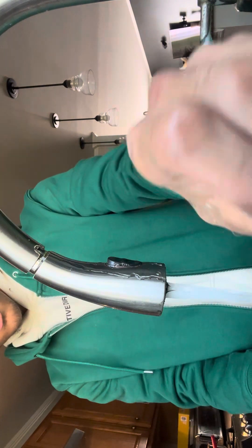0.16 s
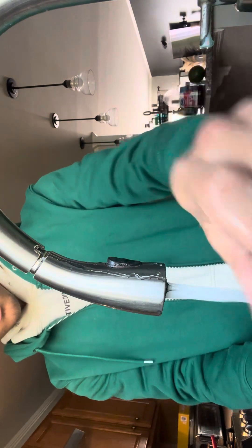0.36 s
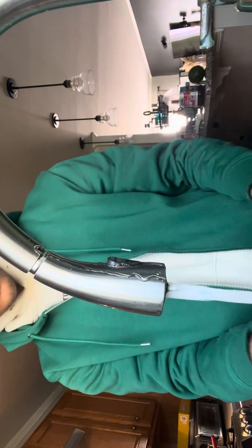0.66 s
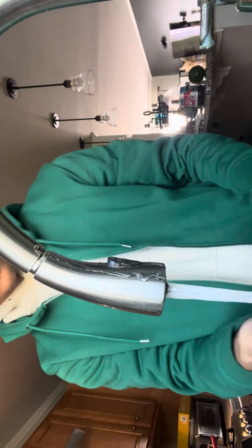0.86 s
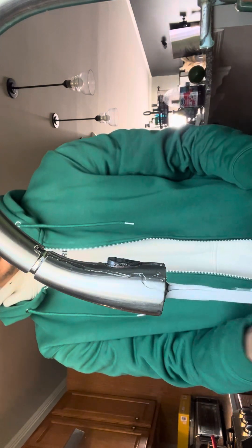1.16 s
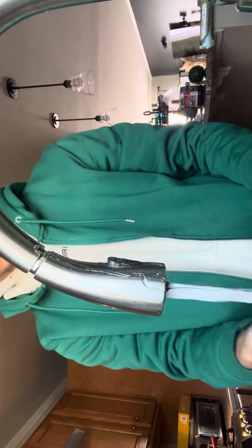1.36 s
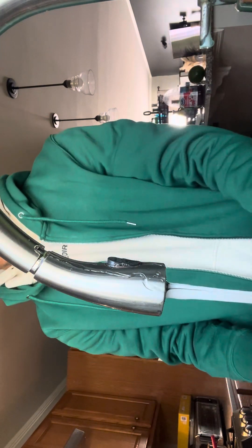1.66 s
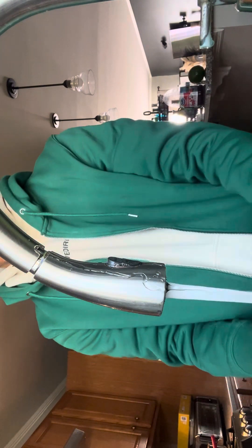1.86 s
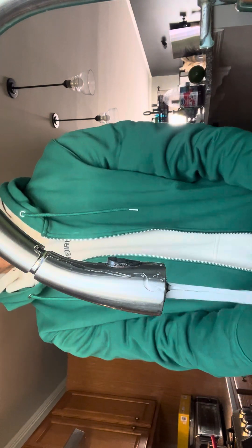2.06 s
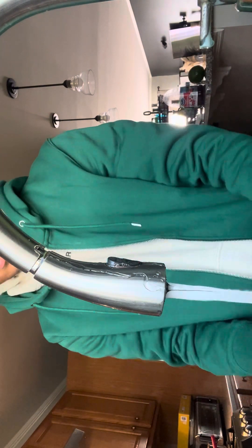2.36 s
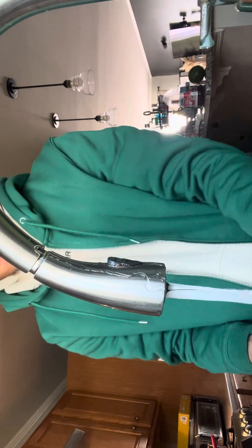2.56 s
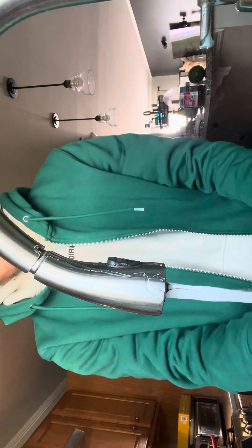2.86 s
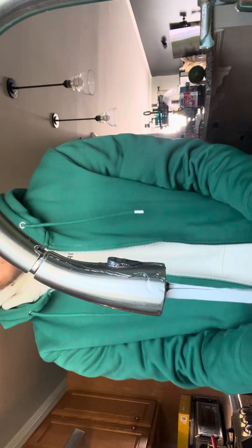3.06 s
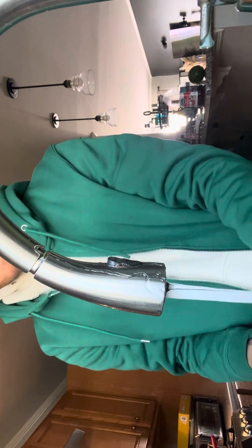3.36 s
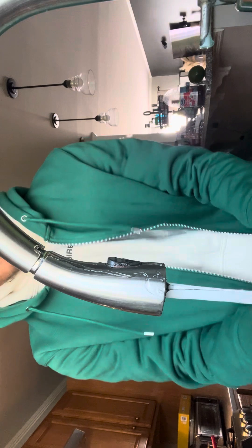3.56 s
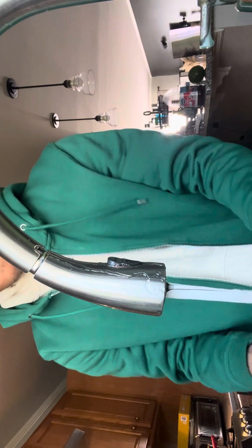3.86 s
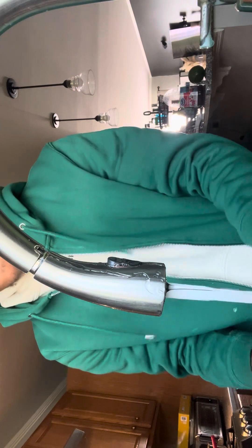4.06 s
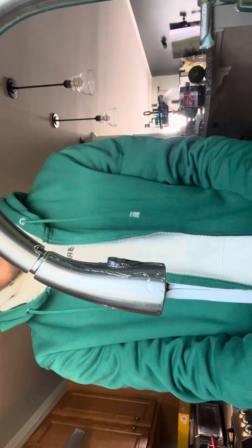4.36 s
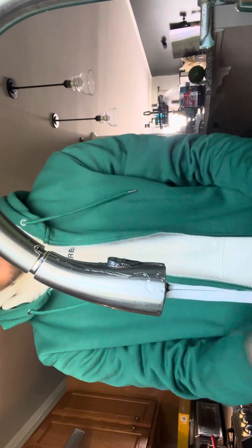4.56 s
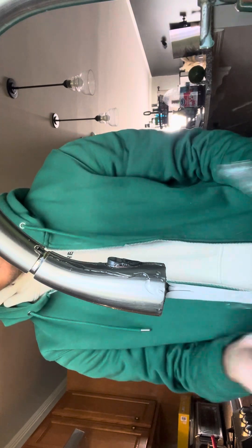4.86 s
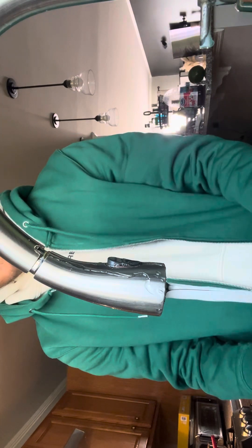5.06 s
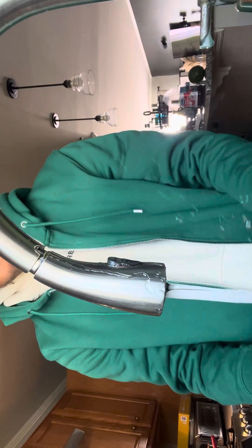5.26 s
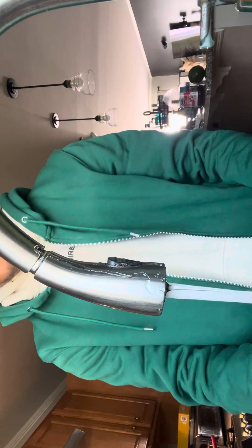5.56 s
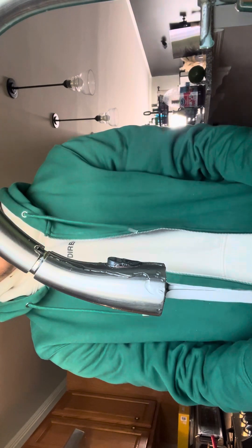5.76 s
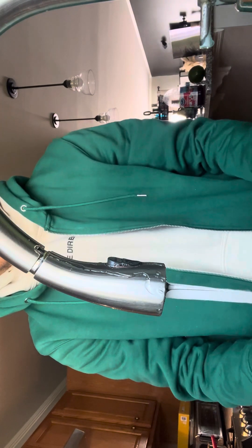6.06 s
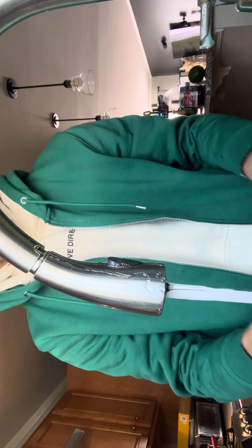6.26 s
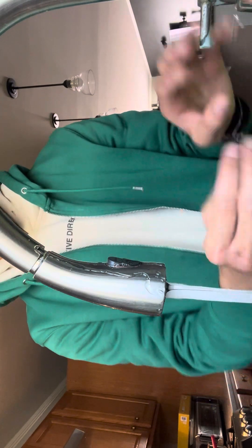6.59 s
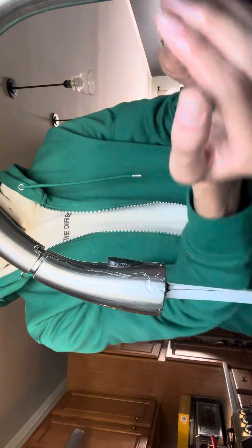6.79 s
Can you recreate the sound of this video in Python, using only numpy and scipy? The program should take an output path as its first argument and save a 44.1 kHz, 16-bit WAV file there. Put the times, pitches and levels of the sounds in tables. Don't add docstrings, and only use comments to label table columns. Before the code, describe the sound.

Close, bright running water broken by hands washing: surging spray, sloshing palms, pinging drops and a few dull bumps on a metal basin.

```python
import sys
import numpy as np
from scipy import signal
from scipy.fft import rfft, irfft, next_fast_len
from scipy.io import wavfile

SR = 44100
rng = np.random.default_rng(int(sys.argv[2]) if len(sys.argv) > 2 else 0)


def gain_from_db(level_db):
    decades = np.asarray(level_db, float) / 20
    return 10 ** decades


def log_audio(samples):
    frames = np.atleast_2d(samples).T
    limited = np.clip(frames, -1, 1)
    pcm = np.round(limited * 32767).astype(np.int16)
    wavfile.write(sys.argv[1], SR, pcm)


N = 305613


def rms_one(x):
    return x / np.sqrt(np.mean(x ** 2) + 1e-20)


def at_hz(points, hz, column=1):
    points = np.array(points)
    return np.interp(np.log(hz), np.log(points[:, 0]), points[:, column])


def drift(rate):
    r = np.exp(-80 * np.pi * rate / SR)
    noise = rng.standard_normal(N // 40 + 2002)
    slow = signal.lfilter([1], [1, -2 * r, r * r], noise)[2000:]
    return np.interp(np.arange(N) / 40, np.arange(len(slow)), rms_one(slow))


def ring(clicks, hz, t60):
    r = gain_from_db(-60 / (t60 * SR))
    w = 2 * np.pi * hz / SR
    return signal.lfilter([0, np.sin(w)], [1, -2 * r * np.cos(w), r * r], clicks + 1e-18)


def drive(per_s, spread_db, share):
    sizes = gain_from_db(spread_db * np.minimum(rng.exponential(1, (4, N)), 5))
    sizes = sizes * rng.choice([-1, 1], (4, N))
    impacts = rms_one(sizes * (rng.random((4, N)) < per_s / SR))
    return (rng.standard_normal((4, N)) + share * impacts).reshape(2, 2, N)


def coloured(spectrum, excite, patchy_db, flutter):
    octaves = np.log2(spectrum[-1][0] / spectrum[0][0])
    edges = spectrum[0][0] * 2 ** np.arange(0, octaves + .1, 1 / 3)
    out = 0
    for k, (low, high) in enumerate(zip(edges, edges[1:])):
        sos = signal.butter(2, [low, high], "band", fs=SR, output="sos")
        band = signal.sosfilt(sos, excite[k % 2])
        level_db = at_hz(spectrum, np.sqrt(low * high)) + patchy_db * drift(14.0)
        out = out + band * gain_from_db(level_db)
    return rms_one(out * gain_from_db(flutter))


def kitchen(x):
    t60_s = 0.073
    t = np.arange(round(.4 * SR)) / SR
    tail = rng.standard_normal((2, len(t))) * gain_from_db(-60 * t / t60_s) * (t > .002)
    tail = signal.sosfilt(signal.butter(2, 300, "high", fs=SR, output="sos"), tail)
    tail = tail / np.sqrt((tail ** 2).sum(1, keepdims=True))
    return signal.fftconvolve(x[None], tail, axes=1)[:, :N]


# (frequency [Hz], width [Hz], gain [dB])
BOWL_WAVES = [(650, 13, -12.5), (730, 26, -8.5), (1010, 90, -14), (1700, 82, 2), (1750, 23, 1.5),
              (2160, 115, -5.5), (2500, 270, -4), (3600, 120, 1.5), (6360, 340, 0)]


def bowl(x):
    for hz, width, db in BOWL_WAVES:
        w, a = 2 * np.pi * hz / SR, gain_from_db(db / 2)
        k = np.pi * width / SR
        top = [1 + k * a, -2 * np.cos(w), 1 - k * a]
        bottom = [1 + k / a, -2 * np.cos(w), 1 - k / a]
        x = signal.lfilter(top, bottom, x)
    return x


# (frequency [Hz], level per Hz [dB])
STREAM_COLOUR = [(2300, -12), (2900, -7), (4200, 6.5), (5200, 6.5), (6400, 6), (8000, -4), (9500, -29),
                 (11500, -2), (14000, 4.5), (17000, -7)]


def stream():
    excite = drive(4000, spread_db=1.0, share=1.0)
    return gain_from_db(-45) * coloured(STREAM_COLOUR, excite, 1.0, 0.15 * drift(12))


# (frequency [Hz], level per Hz [dB])
DRUM_COLOUR = [(30, -36), (42, -15), (65, -1), (90, -11), (122, -2), (150, -6.5), (200, -5.5), (300, -25),
               (500, -9.5)]


def drumming(drum_db):
    turbulence = rng.standard_normal((2, 2, N))
    return gain_from_db(drum_db - 3.6) * coloured(DRUM_COLOUR, turbulence, 2.0, 1.5 * drift(22))


# (start [s], end [s], level [dB])
FREE_JET_SPANS = [
    (0, 0.425, -41),
    (5.473, 6.93, -40),
]


def patter():
    pitch_hz, spread_hz, t60_s = 6400, 360, 0.0045
    t = np.arange(N) / SR
    gate = 0
    for start, end, db in FREE_JET_SPANS:
        gate = gate + gain_from_db(db) * np.clip(np.minimum(t - start + 0.026, end - t + .02) / .04, 0, 1)
    excite = drive(830, spread_db=3.5, share=2.5)
    pings = 0
    for k, step in enumerate((-1, 0, 1)):
        pings = pings + ring(excite[k % 2], pitch_hz + spread_hz * step, t60_s)
    return gate * rms_one(pings * gain_from_db(5.4 * drift(40)))


# (frequency [Hz], level per Hz [dB])
SLOSH_COLOUR = [(350, -4), (600, -8.5), (950, 1.5), (1250, -5.5), (1480, -3.5), (1950, 1.5), (2800, 7.5)]
# (frequency [Hz], width [Hz], level [dB])
HOLLOW_NOTES = [(123, 24, -3), (327, 27, -9), (583, 40, -5), (703, 45, -10), (1150, 110, -5),
                (1255, 30, -9), (1830, 90, -3), (1981, 70, -9), (2123, 20, -14), (2285, 70, -8)]


def slosh(slosh_db):
    excite = drive(500, spread_db=2.5, share=0.34)
    bed = coloured(SLOSH_COLOUR, excite, 1.8, 1.0 * drift(11.0))
    notes = 0
    for hz, width, db in HOLLOW_NOTES:
        note = rms_one(ring(excite[0], hz, 1.6 / width))
        notes = notes + gain_from_db(db + 2.2 * drift(8)) * note
    return gain_from_db(slosh_db + 3.0) * (bed + gain_from_db(-8.0) * notes)


# (frequency [Hz], struck level [dB], t60 [s])
BASIN_MODES = [(122.6, -7, 0.29), (170, 0.5, 0.061), (232.6, -7, 0.21), (325, -5, 0.15), (520, 4.5, 0.07),
               (674, -6.5, 0.12), (1050, -25, 0.05), (1245, -3, 0.088), (1800, 10, 0.14)]
# (time [s], peak [dB], hardness [dB], pitch of the hollow part [Hz])
KNUCKLES = [(0.687, -52, -24, 120), (1.207, -38.5, -11, 1310), (1.521, -33, 1, 940),
            (1.534, -36.5, -4, 580), (1.543, -22.5, -7, 121), (2.751, -33, -11, 221),
            (3.284, -30.5, -9.5, 520), (3.374, -29.5, -27, 147), (3.436, -36, -21, 118),
            (3.489, -30, -7.5, 520), (3.622, -32, -6.5, 538), (3.963, -26.5, -6.5, 325),
            (3.974, -22, -13.5, 127), (3.982, -17, -16.5, 89), (4.08, -27, -25, 67), (4.096, -31, -32, 69),
            (4.237, -31.5, -15, 130), (4.387, -31, 0, 218), (4.401, -32, -14, 323),
            (5.632, -34.5, -4.5, 517), (5.788, -34.5, -3, 106), (6.093, -41, 3, 1260),
            (6.817, -36.5, 2.5, 113), (6.869, -35, -20, 55), (6.899, -32, -0.5, 434)]


def knocks():
    rows = np.array(KNUCKLES)
    at = [round(s * SR) for s in rows[:, 0]]
    out = np.zeros(N)
    chance = rng.standard_normal((len(at), len(BASIN_MODES)))
    for (hz, db, t60), luck in zip(BASIN_MODES, chance.T):
        upper = np.clip(np.log2(hz / 250) / 0.27, 0, 1)
        push_db = rows[:, 1] + db - 7.5 + upper * rows[:, 2] + 3.75 * luck
        clicks = np.zeros(N)
        clicks[at] = gain_from_db(push_db) * np.sign(luck)
        out += ring(clicks, hz, t60)
    t = np.arange(8000) / SR
    band = signal.butter(2, [250, 1200], "band", fs=SR, output="sos")
    rattles = signal.sosfilt(band, rng.standard_normal((len(at), len(t))))
    for i, (s, db, hard_db, hz), rattle in zip(at, KNUCKLES, rattles):
        decay = gain_from_db(-60 * t / (.035 + 17 / hz))
        build = 1 - np.exp(-t * hz / 1.9)
        note = np.sin(2 * np.pi * hz * t) * decay * build
        clatter = gain_from_db(hard_db + 5.0) * rattle * gain_from_db(-60 * t / 0.27)
        out[i:i + len(t)] += (gain_from_db(db + 3) * note + gain_from_db(db) * clatter)[:N - i]
    contact_s = .0003
    soft = np.hanning(round(contact_s * SR) + 3)
    return np.convolve(out, soft / soft.sum())[:N]


# (time [s], peak [dB], pitch [Hz])
POCKETS = [(0.689, -32.5, 1120), (0.69, -28, 1270), (1.099, -26, 2160), (1.159, -26, 1930),
           (1.216, -23, 1233), (1.519, -15.5, 1282), (1.538, -20, 1260), (1.534, -21, 1800),
           (1.87, -29, 555), (3.309, -32, 1120), (3.438, -26.5, 547), (3.735, -28, 1137), (3.97, -30, 700),
           (3.971, -32, 1050), (4.28, -31, 543), (4.391, -33, 1050), (4.401, -29, 740),
           (4.496, -20.5, 2160), (4.509, -22, 1800), (4.529, -21.5, 2150), (4.915, -32, 586),
           (5.01, -29, 1210), (5.09, -31, 2600), (5.202, -32, 1920), (5.015, -24, 2210), (5.029, -38, 2300),
           (5.39, -37, 530), (5.449, -36, 490), (5.49, -26, 510), (5.505, -35, 586), (5.784, -30, 840),
           (6.097, -30, 1250), (6.193, -18.5, 2365), (6.269, -34, 1920), (6.614, -30, 1950),
           (6.809, -37, 1700), (6.827, -40, 526)]


def plops():
    twin_ratio, twin_db = .93, -8
    out, t = np.zeros(N + 4000), np.arange(4000) / SR
    for s, db, hz in POCKETS:
        turn = 2 * np.pi * hz * (t + 1.0 * t ** 2)
        swell = gain_from_db(-60 * t / (.03 + 59.0 / hz)) * (1 - np.exp(-t / 0.0004))
        pair = np.sin(turn) + gain_from_db(twin_db) * np.sin(twin_ratio * turn)
        out[round(s * SR):][:4000] += gain_from_db(db - 8.5) * swell * pair
    return out[:N]


def smacks(rows, crack_db, cycles, gain_db):
    fall_s, rise_s = .0028, .0004
    out, t = np.zeros(N + 2000), np.arange(2000) / SR
    chance = rng.standard_normal((60, 2000))
    for (s, db, hz), noise in zip(rows, chance):
        spatter = noise * np.exp(-t / fall_s) * (1 - np.exp(-t / rise_s))
        rung = ring(spatter, hz, cycles / hz)
        crack = np.diff(spatter, prepend=0)
        smack = rung / np.abs(rung).max() + gain_from_db(crack_db + 10) * crack / np.abs(crack).max()
        out[round(s * SR):][:2000] += gain_from_db(db + gain_db) * smack
    return out[:N]


# (time [s], peak [dB], pitch [Hz])
STEEL_HITS = [(0.0518, -39, 6640), (0.1151, -18, 6060), (0.233, -20.5, 6400), (0.3534, -18, 7040),
              (0.3815, -20, 6500), (0.6604, -30, 6200), (1.27, -22, 6100), (1.3034, -23.5, 6360),
              (1.4616, -19, 6000), (1.51, -28, 6360), (1.7678, -24.5, 6200), (2.0301, -18, 5800),
              (2.0542, -21.5, 5980), (2.315, -23, 6460), (2.3244, -12.5, 7220), (2.826, -19.5, 5830),
              (3.832, -25, 5940), (4.905, -19, 6800), (4.9786, -22, 6400), (5.4842, -25, 6600),
              (5.5707, -18, 6400), (6.154, -19, 6200), (6.2177, -18, 6460), (6.3081, -26, 6900),
              (6.386, -16, 6400), (6.404, -15, 6650), (6.519, -21, 6600), (6.54, -18, 6500),
              (6.556, -18, 6650), (6.6378, -21, 6900), (6.7203, -18, 6340)]


def steel_drops():
    return smacks(STEEL_HITS, crack_db=-17, cycles=35.0, gain_db=0.83)


# (time [s], peak [dB], pitch [Hz])
SKIN_HITS = [(0.3351, -27, 5030), (1.526, -17, 3640), (1.6237, -27, 3170), (3.423, -26.5, 3680),
             (3.4976, -25.5, 4070), (4.2612, -25.5, 4530), (5.0025, -22, 4340), (5.0524, -25, 3480),
             (4.916, -19.5, 6400), (5.122, -24, 3930), (5.279, -33, 5960), (5.39, -31, 4400),
             (5.793, -20, 6140), (5.802, -24, 6300), (5.6565, -28, 3400), (4.278, -26, 6400),
             (6.313, -27.5, 3500), (6.3864, -23.5, 3600), (6.5191, -27.5, 3630), (6.7675, -24, 3470),
             (6.8044, -27.5, 3440)]


def skin_drops():
    return smacks(SKIN_HITS, crack_db=-16, cycles=32.0, gain_db=4.0)


# (time [s], peak [dB], pitch [Hz])
SPATTER_HITS = [(0.062, -20, 6370), (0.145, -22, 6620), (0.165, -27, 6440), (0.1745, -16, 6380),
                (0.1964, -17, 6300), (0.6305, -19, 6100), (0.6666, -30, 6330), (0.6894, -23, 5950),
                (0.7594, -34, 6330), (1.05, -27, 3230), (1.103, -26, 6000), (1.12, -21, 6330),
                (1.1344, -32, 6270), (1.1594, -30, 6320), (1.184, -25, 3470), (1.936, -20, 3220),
                (1.9649, -16.5, 6100), (2.4008, -16.5, 7360), (2.4537, -32, 3890), (2.7814, -21, 5530),
                (2.8344, -18.5, 6200), (3.1494, -20.5, 6100), (3.2114, -26, 3700), (3.232, -25, 4800),
                (3.2914, -30, 5990), (3.485, -31, 4150), (3.5433, -19.5, 5830), (3.5567, -24, 5910),
                (3.7933, -22, 5960), (3.8701, -21, 6070), (3.8798, -27, 5540), (3.914, -30, 4540),
                (4.3844, -24, 6390), (4.4862, -20.5, 5260), (4.5024, -22, 5870), (4.5451, -21, 5640),
                (4.5674, -27, 6710), (4.5835, -19, 3700), (4.6058, -19, 3430), (4.6264, -23, 3450),
                (5.0754, -17, 5900), (5.4174, -17, 6400), (5.5001, -16.5, 6410), (5.5574, -27, 6500),
                (5.6944, -22, 6370), (5.7315, -25, 6550), (5.7767, -18.5, 5860), (5.9, -29, 5330),
                (5.931, -25, 6310), (5.9616, -19.5, 6300), (5.9923, -21, 5540), (6.0955, -19.5, 6560),
                (6.1095, -20, 6430), (6.653, -15, 6560), (6.7312, -23, 5500), (6.7434, -24, 6650),
                (6.8768, -32, 6200)]


def spatters():
    return smacks(SPATTER_HITS, crack_db=-17, cycles=29.0, gain_db=-1.5)


# (frequency [Hz], level per Hz [dB])
SPRAY_COLOUR = [(1500, -12.5), (2300, -4.5), (2800, 6.5), (3500, -1.5), (4300, 0.5), (5300, -0.5),
                (5900, -16), (6400, 4), (7000, 4), (8000, -4), (9500, -9.5), (11500, 0.5)]
# (frequency [Hz], level per Hz [dB])
MIST_COLOUR = [(7000, -3), (9500, -2), (11500, -9.5), (13000, -9), (15000, -12.5), (17000, -18)]


def spray(spray_db, mist_db):
    flutter = 1.47 * drift(37.0) + 1.7 * drift(110)
    excite = drive(2600, spread_db=3.0, share=1.0)
    body = coloured(SPRAY_COLOUR, excite, 1.6, flutter)
    mist = coloured(MIST_COLOUR, excite, 1.0, 1.24 * flutter)
    return gain_from_db(spray_db + 1.0) * body + gain_from_db(spray_db + mist_db + 4.0) * mist


# (time of full spray [s], hold [s], spray [dB], fine mist re spray [dB], water landing on the basin [dB])
RUB_STROKES = [(0, 0.42, -36, -8.5, -51.5), (0.587, 0.23, -35.5, -14, -47), (1.055, 0.095, -33, -13, -41.5),
               (1.24, 0.17, -37.5, -11.5, -51), (1.967, 0.073, -33, -10, -43), (2.375, 0.1, -32, -8, -49.5),
               (2.813, 0.054, -32.5, -14, -48), (3.163, 0.057, -34.5, -8, -47),
               (3.556, 0.0055, -31.5, -15, -61), (3.802, 0.15, -36.5, -7.5, -45.5),
               (4.556, 0.001, -26.5, -12, -46), (5.01, 0.094, -30.5, -8, -43.5),
               (5.514, 0.059, -37, -7.5, -69), (5.67, 0.58, -38, -6, -72), (6.388, 0.3, -39, -1, -74)]
# (time [s], hold [s], spray [dB], fine mist re spray [dB], water landing on the basin [dB])
FLUNG_HANDFULS = [(0.04, .01, -50, 3, -43), (0.66, 0.025, -29.5, -18, -75), (1.463, 0.001, -33, -10, -40),
                  (1.51, 0.031, -25, -12.5, -41.5), (1.674, 0.091, -36, -19, -54),
                  (2.77, 0.018, -41.5, 0, -45), (3.3, 0.002, -40, -14, -50), (3.401, 0.001, -31, -19, -37),
                  (3.913, 0.013, -31, -13, -64), (3.991, 0.001, -70, -14, -33), (4.14, 0.13, -42, -10, -46),
                  (4.256, 0.015, -29, -13.5, -48), (4.36, 0.13, -37, -21, -44.5),
                  (4.909, 0.001, -32, -6.5, -36.5), (5.26, 0.001, -42, -4, -61),
                  (5.391, 0.018, -29, -14, -39.5), (5.756, 0.001, -53, -16, -47),
                  (6.385, 0.005, -38, -16, -63), (6.63, 0.01, -31, -10, -67),
                  (6.726, 0.014, -30.5, -7.5, -67), (6.804, 0.134, -38.5, -3.5, -59)]


def wash():
    rubs, flings = len(RUB_STROKES), len(FLUNG_HANDFULS)
    s, hold, spray_db, mist_db, land_db = np.transpose(RUB_STROKES + FLUNG_HANDFULS)[:, :, None]
    rise = np.array([92] * rubs + [2400] * flings)[:, None]
    settle = np.array([99.5] * rubs + [135] * flings)[:, None]
    t = np.arange(0, N + 100, 100) / SR
    shape = -rise * np.maximum(s - t, 0) - settle * np.maximum(t - s - hold, 0)
    pooled = 0.53 * shape
    from_spray = 0.19
    slosh_db = -5 + from_spray * spray_db + (1 - from_spray) * land_db
    # stroke levels, resting level between strokes [dB]
    layers = [(spray_db + shape, -45.5),
              (spray_db + mist_db + 4.5 + shape, -52.5),
              (slosh_db + pooled, -47),
              (land_db + pooled, -50.5)]
    levels = []
    for db, rest in layers:
        power = (gain_from_db(db) ** 2).sum(0) + gain_from_db(rest) ** 2
        levels.append(np.interp(np.arange(N) / SR, t, 10 * np.log10(power)))
    return levels


# (frequency [Hz], phase of right against left [rad], likeness
# [0-1], left minus right [dB])
PORT_PAIR = [(100, 0, .999, .1), (420, .15, .92, 1.5), (610, .6, .82, 7), (760, .7, .6, 4), (880, .5, .7, 2),
             (1000, .5, .72, 4), (1100, 1, .82, 6.5), (1225, 1.4, .7, 7.5), (1270, 2.45, .87, 5),
             (1450, 3, .87, 1), (1550, 2.4, .72, 1), (1640, 2.15, .8, 2), (1760, 2.5, .85, 1),
             (1860, 3.15, .94, 1), (1900, 3.3, .75, 2), (1970, .6, .55, 1), (2040, 2.2, .7, 0),
             (2170, 2.7, .65, .5), (2270, 2.3, .75, .8), (2420, 2.8, .75, .5), (2550, 2.85, .8, .6),
             (2680, 2.95, .86, 1), (2800, 2.9, .82, 3), (3000, 2.8, .65, 2),
             (3150, 4.5, .15, 1), (3350, 6.1, .5, 2), (4200, 7, .55, 0), (4900, 5.05, .33, -1.8),
             (5800, 5.2, .84, -.5), (6600, 4.8, .83, 0), (7500, 3.9, .82, 0), (7900, 3.4, .93, 0),
             (8500, 3.2, .965, 0), (9900, 3.05, .968, 0), (10600, 2.7, .87, 0), (11500, 1.65, .7, 0),
             (12300, .75, .75, 0), (12800, .05, .98, 0)]


def port_pair(direct, stray, below):
    size = next_fast_len(N + 4096)
    hz = np.maximum(np.arange(size // 2 + 1) * SR / size, 1)
    phase, alike, tilt_db = [at_hz(PORT_PAIR, hz, column=k) for k in (1, 2, 3)]
    left, low = rfft(direct, size), rfft(below, size)
    right = alike * np.exp(1j * phase) * left + np.sqrt(1 - alike ** 2) * rfft(stray, size)
    right += np.exp(1j * .5 * phase) * low
    left += low
    pair = np.array([left * gain_from_db(tilt_db / 2), right * gain_from_db(-tilt_db / 2)])
    return irfft(pair, size)[:, :N]


def scene():
    spray_db, mist_db, slosh_db, drum_db = wash()
    water = bowl(spray(spray_db, mist_db - spray_db) + slosh(slosh_db) + stream())
    water = water + drumming(drum_db) + patter()
    hits = knocks() + steel_drops() + skin_drops() + spatters()
    pockets = plops()
    echo = kitchen(hits + pockets)
    direct = water[0] + hits + gain_from_db(-6) * echo[0]
    stray = water[1] + gain_from_db(2.0) * echo[1]
    return port_pair(direct, stray, pockets)


def low_pass(x):
    return signal.sosfilt(signal.butter(12, 15960, fs=SR, output="sos"), x)


def record(dry):
    cut = signal.sosfilt(signal.ellip(10, .3, 80, 15900, fs=SR, output="sos"), dry)
    cut = signal.sosfilt(signal.butter(3, 30, "high", fs=SR, output="sos"), cut)
    return low_pass(cut)


dry = scene()
out = record(dry)
log_audio(out)
```